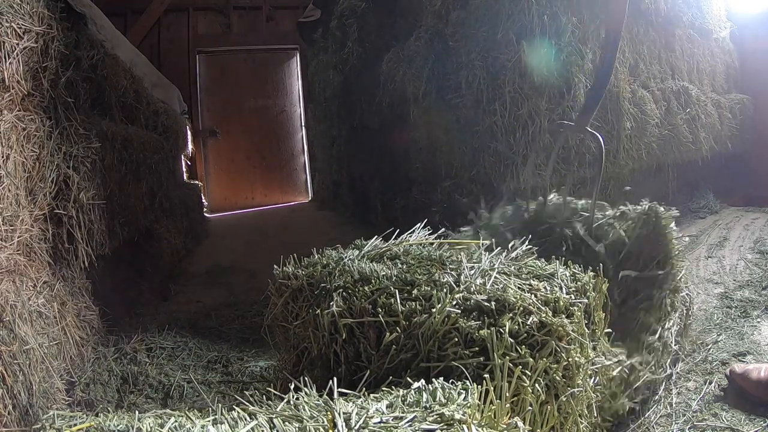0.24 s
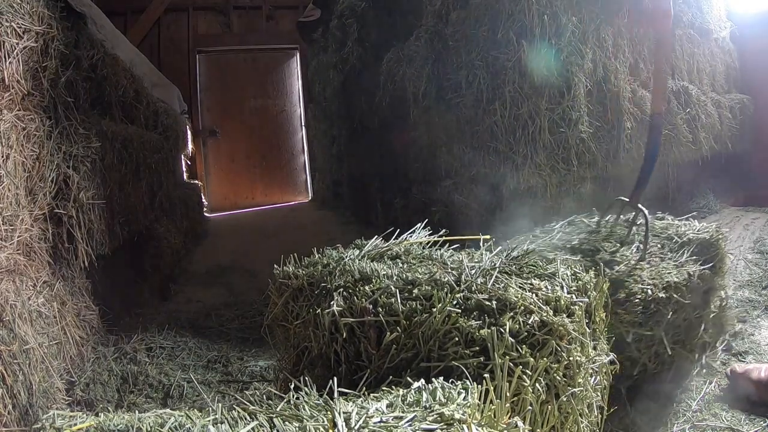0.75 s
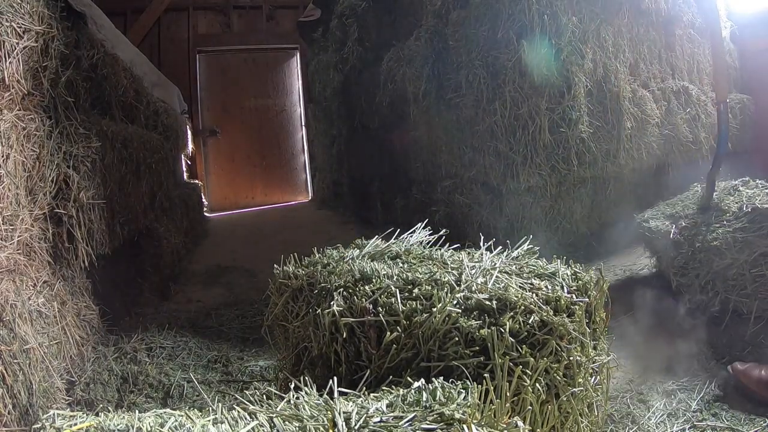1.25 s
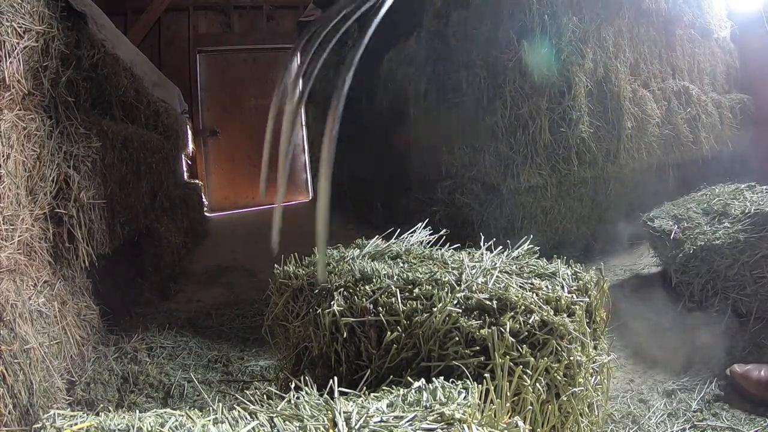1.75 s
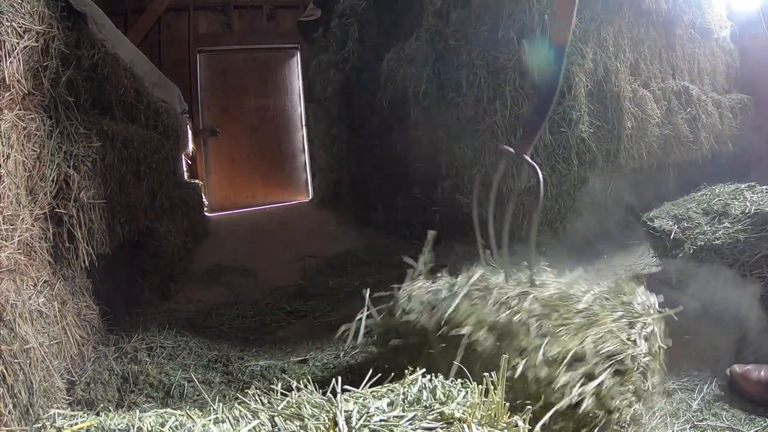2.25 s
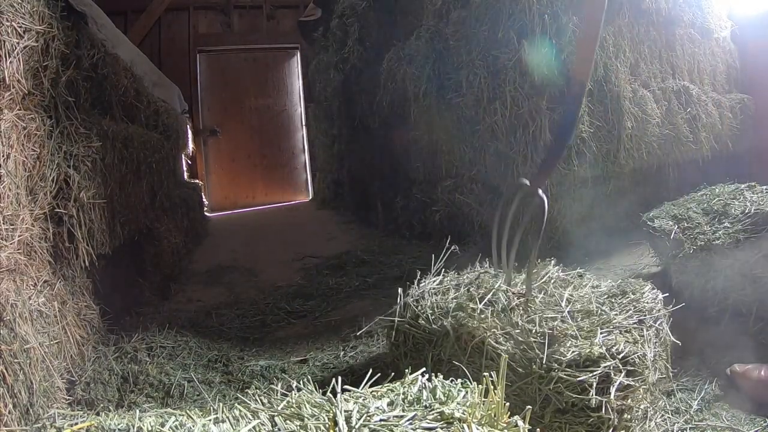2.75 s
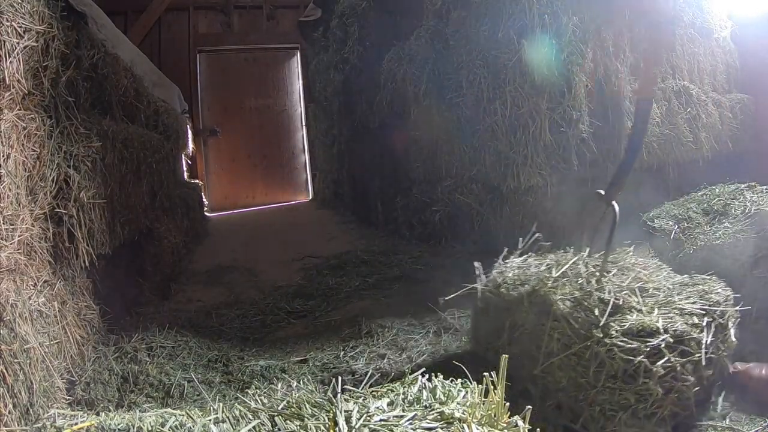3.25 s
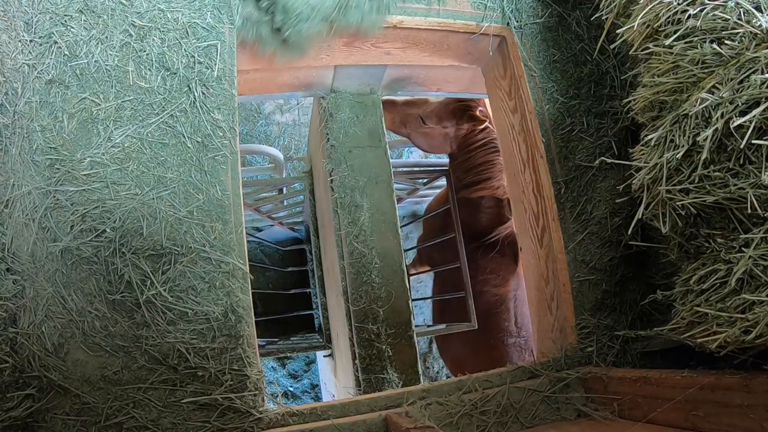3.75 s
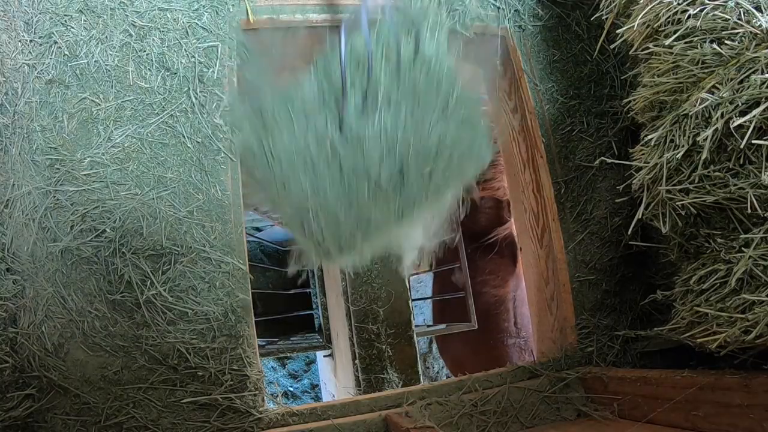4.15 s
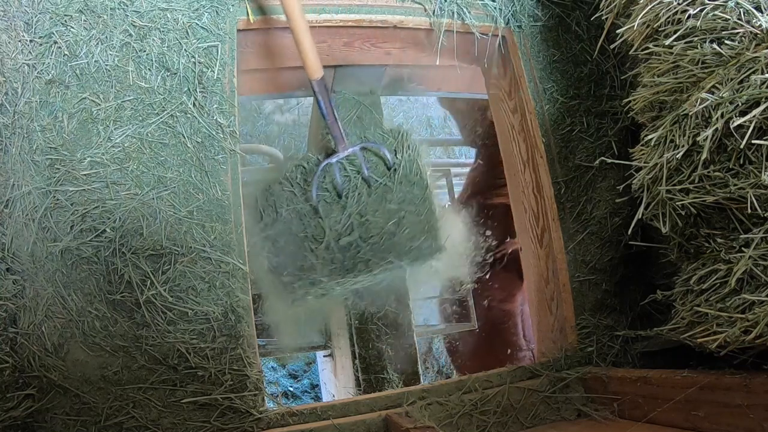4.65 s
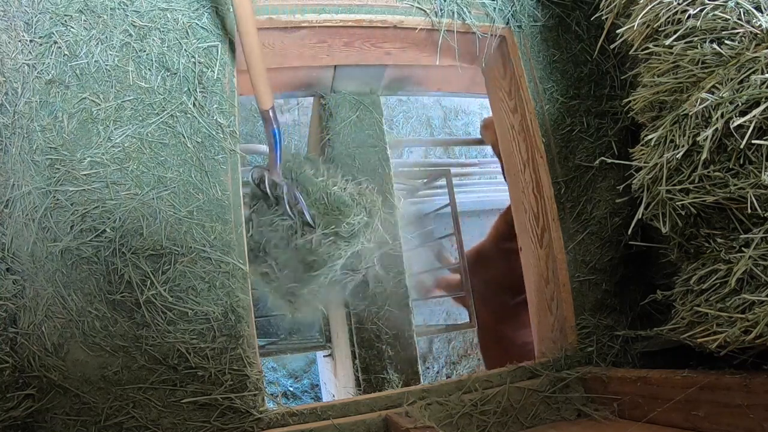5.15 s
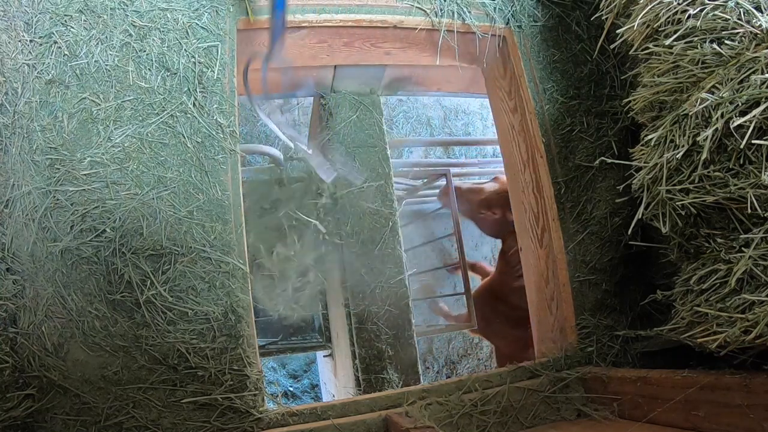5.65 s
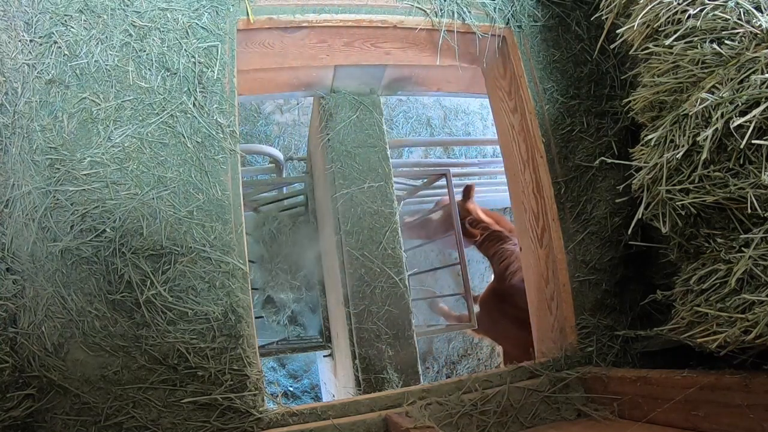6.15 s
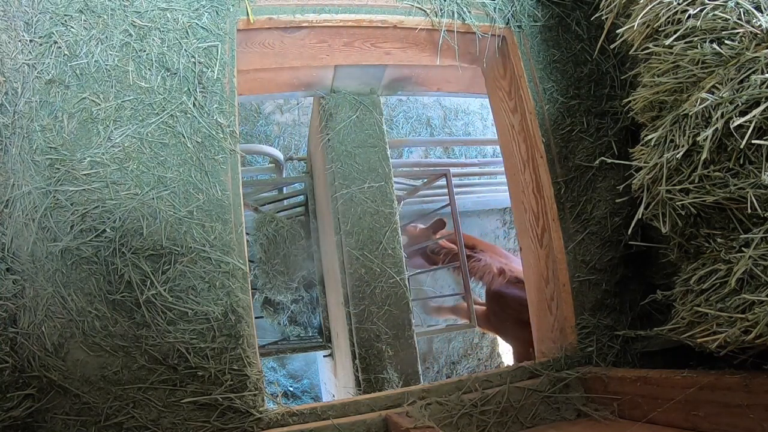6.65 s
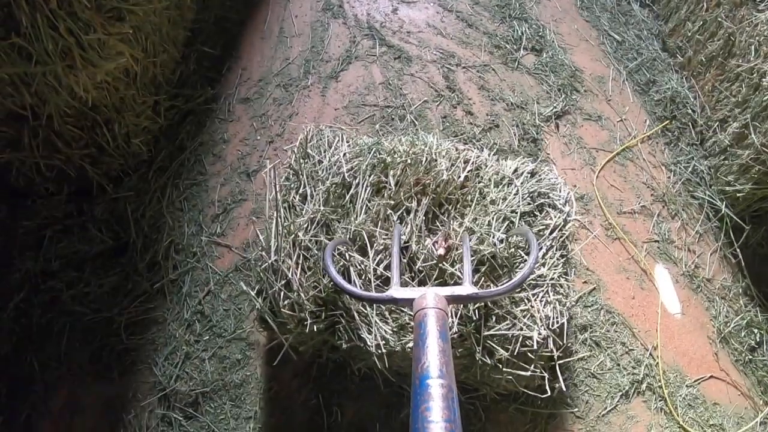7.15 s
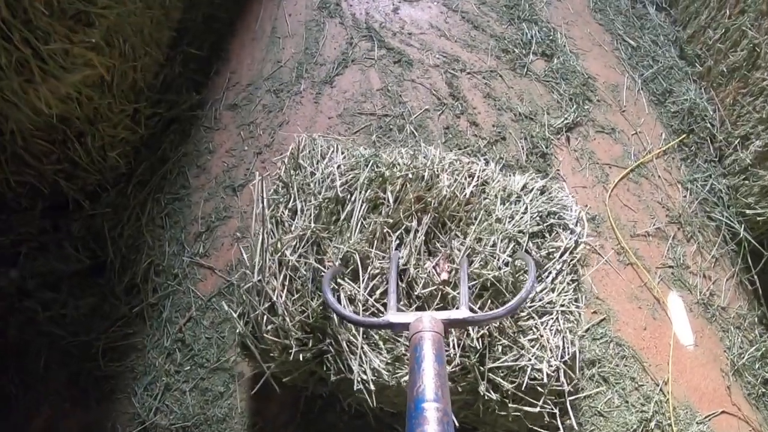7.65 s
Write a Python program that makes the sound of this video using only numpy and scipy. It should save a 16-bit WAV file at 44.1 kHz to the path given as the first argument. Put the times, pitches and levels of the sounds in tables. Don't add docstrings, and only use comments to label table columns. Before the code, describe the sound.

Pitchfork work in a hayloft: rustling stems, a soft bale thump, ringing tines, loud wooden knocks at a hatch, finally dull jolts through the handle.

```python
import sys
import numpy as np
from scipy import signal
from scipy.fft import rfft, irfft, next_fast_len
from scipy.io import wavfile
from scipy.ndimage import uniform_filter1d

SR = 44100
rng = np.random.default_rng(int(sys.argv[2]) if len(sys.argv) > 2 else 0)


def level_to_linear(level):
    exponent = np.asarray(level, float) / 20
    return 10 ** exponent


def store_wav(level_fs):
    pcm = np.round(np.clip(np.atleast_2d(level_fs), -1, 1) * 32767)
    wavfile.write(sys.argv[1], SR, pcm.T.astype(np.int16))


N = 348831

# pitch_hz, level_db, t60_s (time to fade by 60 dB)
FRAME_MODES = [(193.2, -2.5, 0.31), (244.2, 3, 0.18), (300, -9, 0.085), (373, -9.5, 0.099),
               (470, -5.5, 0.087), (524, -5.5, 0.026), (760, -8.5, 0.039), (1126, 7.5, 0.059),
               (1320, -8, .05)]
# pitch_hz, level_db, t60_s
BEAM_MODES = [(144, -15.5, .1), (249.6, -7.5, 0.12), (330, 2.5, 0.16), (453, -5.5, 0.11),
              (650, -7.5, 0.077), (739, -11.5, 0.11), (1000, -1, 0.04), (1740, -20.5, 0.036)]
# pitch_hz, level_db, t60_s
FLOOR_MODES = [(42, 11.5, 0.25), (76.6, 5.5, 0.13), (109, -23, 0.067), (146, 9, 0.058), (208.3, -9.5, 0.24),
               (330, -20.5, 0.094)]
# pitch_hz, level_db, t60_s
YOKE_MODES = [(3155, -4, 1.8), (4240, 0, 3), (4485, 1.5, 2.0)]
SCENE_CHANGES_S = [
    1.506,
    6.7,
]


def rms_one(x):
    return x / np.sqrt(np.mean(x ** 2) + 1e-20)


def mix_db(*levels):
    return 10 * np.log10(sum(level_to_linear(2 * np.asarray(db)) for db in levels))


def add(out, s, burst):
    i = round(s * SR)
    out[i:i + len(burst)] += burst[:N - i]


def in_time(tables):
    s, *columns = np.concatenate(tables).T
    return [np.interp(np.arange(N) / SR, s, c) for c in columns]


def coloured(x, spectrum):
    hz, db = np.transpose(spectrum)
    size = next_fast_len(len(x))
    grid = np.log(np.arange(size // 2 + 1) * SR / size + 1)
    gain = level_to_linear(np.interp(grid, np.log(hz), db))
    return rms_one(irfft(rfft(x, size) * gain, size)[:len(x)])


def drift(rate):
    r = np.exp(-80 * np.pi * rate / SR)
    noise = rng.standard_normal(N // 40 + 2002)
    slow = signal.lfilter([1], [1, -2 * r, r * r], noise)[2000:]
    return np.interp(np.arange(N) / 40, np.arange(len(slow)), rms_one(slow))


def grains(per_s, spread_db, clump_db, smooth):
    sizes = level_to_linear(spread_db * np.minimum(rng.exponential(1, N), 5)) * rng.choice([-1, 1], N)
    born = rng.random(N) < per_s * level_to_linear(clump_db * drift(25)) / SR
    return rms_one(rms_one(sizes * born) + smooth * rng.standard_normal(N))


def favour(hz, best_hz, slope_db):
    return -slope_db * np.log2(hz / best_hz) ** 2


def resonate(x, hz, width):
    r = np.exp(-np.pi * width / SR)
    feedback = [1, -2 * r * np.cos(2 * np.pi * hz / SR), r * r]
    return signal.lfilter([(1 - r * r) / 2, 0, (r * r - 1) / 2], feedback, x + 1e-18)


def rubbed(resonances, db, per_s, rough_db, best_hz=None, slope_db=0):
    slips = level_to_linear(db) * grains(per_s, spread_db=rough_db, clump_db=rough_db, smooth=0.65)
    out = 0
    for k, (hz, width, level) in enumerate(resonances):
        near = 1 if best_hz is None else level_to_linear(favour(hz, best_hz, slope_db))
        sharp = resonate(resonate(slips * near, hz, 2.09 * width), hz, 3 * width)
        out = out + (-1) ** k * level_to_linear(level - 3.0) * np.sqrt(SR / (3 * width)) * sharp
    return out


def struck(hits, modes, db, slope_db, rise_s):
    out, t = np.zeros(N), np.arange(SR // 2) / SR
    signs = rng.choice([-1, 1], (len(hits), len(modes)))
    for (s, peak_db, best_hz), sign in zip(hits, signs):
        body = np.zeros(len(t))
        for (hz, level, t60), g in zip(modes, sign):
            mode_db = level + favour(hz, best_hz, slope_db) - 60 * t / t60
            body += g * level_to_linear(mode_db) * np.sin(2 * np.pi * hz * t)
        body *= (1 - np.exp(-t / rise_s)) ** 2
        add(out, s, level_to_linear(peak_db + db) * body / np.abs(body).max())
    return out


def tine(taps, modes, db, cut_db, slope_db=0):
    out, t = np.zeros(N), np.arange(int(.7 * SR)) / SR
    for (s, peak_db, factor, *best_hz), luck in zip(taps, rng.standard_normal((len(taps), len(modes)))):
        next_change_s = min([c for c in SCENE_CHANGES_S if c > s])
        cut = np.where(s + t < next_change_s, 1, level_to_linear(cut_db))
        thin = np.zeros(len(t))
        for (hz, level, t60), g in zip(modes, luck):
            spot_db = favour(hz, (best_hz or [hz])[0], slope_db)
            mode_db = level + 2 * g + spot_db - 60 * t / (t60 * factor)
            thin += level_to_linear(mode_db) * np.sin(2 * np.pi * hz * t)
        add(out, s, level_to_linear(peak_db + db) * thin * cut)
    return out


def splinter(breaks):
    out, t = np.zeros(N), np.arange(SR // 6) / SR
    for (s, db, hz, decay), noise in zip(breaks, rng.standard_normal((len(breaks), len(t)))):
        edges = [0.67 * hz, min(1.48 * hz, 13000)]
        shape = level_to_linear(-60 * t / decay) * np.minimum(t / (0.029 * decay), 1)
        burst = signal.sosfilt(signal.butter(2, edges, "band", fs=SR, output="sos"), noise * shape)
        add(out, s, level_to_linear(db - 3.5) * burst / np.abs(burst).max())
    return out


def effort(moves, stops=()):
    roundness, stop_fade_s = 1.62, 0.029
    t, power = np.arange(N) / SR, np.full((2, N), 1e-12)
    for s, rise, dying, db, over_db in moves:
        stop = min([c for c in stops if c > s] + [N])
        away = np.where(t < s, (s - t) / rise, (t - s) / dying) ** roundness
        away = away + np.maximum(t - stop, 0) / stop_fade_s
        layers_db = db + np.array([[0], [over_db]])
        power += level_to_linear(2 * (layers_db - 20 * np.minimum(away, 10)))
    return 10 * np.log10(power)


def loft(x):
    t60_s = 0.42
    size = next_fast_len(N + SR)
    turn = -2j * np.pi * np.arange(size // 2 + 1) / size
    dull = 0.21 / (1 - 0.69 * np.exp(turn))
    lags = (rng.uniform(0.0098, .04, 8) * SR).astype(int)
    loops = [level_to_linear(-60 * lag / SR / t60_s) * dull * np.exp(turn * lag) for lag in lags]
    echoes = sum(g / (1 - g) * (-1) ** k for k, g in enumerate(loops))
    return irfft(rfft(x, size) * echoes, size)[:N]


def still_air():
    # pitch_hz, level_db (per Hz)
    air_colour = [(30, 0.5), (500, -6), (1000, -33), (2000, -14), (3000, -36.5), (9000, -20.5),
                  (15000, -26), (16400, -39)]
    return level_to_linear(-66.5) * coloured(rng.standard_normal(N), air_colour)


def hay_moves():
    # start_s (full effort), build_up_s, dying_s, drag_db, crackle_over_drag_db
    loft_moves = [(.23, 0.28, 0.38, -45.5, 6.5), (.72, 0.085, 0.19, -48, 3), (.97, 0.4, 0.42, -37.5, -1),
                  (1.49, 0.35, 0.27, -61.5, 14.5), (1.96, 0.043, 0.045, -42, 10.5),
                  (2.02, 0.083, 0.76, -48, 5.5), (2.285, 0.063, 0.08, -35.5, 4),
                  (2.44, 0.099, 0.16, -50.5, 1.5), (2.66, 0.064, 0.29, -58.5, 21),
                  (2.79, 0.17, 0.12, -38.5, 2), (3.25, 0.28, 0.3, -40.5, -1.5)]
    # start_s, build_up_s, dying_s, drag_db, crackle_over_drag_db
    hatch_moves = [(3.34, 0.039, 0.98, -70.5, 13.5), (3.8, 0.39, 0.22, -40, -1.5),
                   (3.975, 0.17, 0.075, -34, -24), (4.185, 0.66, 0.067, -41.5, 1),
                   (4.32, 0.071, 0.066, -32, 6), (4.42, 0.21, 0.5, -54.5, 12.5), (4.78, 0.2, 0.055, -44, 2),
                   (5.22, 1, 0.15, -42.5, 2.5), (5.54, 0.35, 0.3, -40, 3.5), (5.875, 0.33, 0.43, -46.5, 7),
                   (6.244, 0.061, 0.39, -56, 5.5), (6.42, 0.12, 0.39, -62.5, 11.5),
                   (6.629, 0.15, 0.24, -50.5, 5)]
    # start_s, build_up_s, dying_s, drag_db, crackle_over_drag_db
    push_moves = [
        (6.94, 0.04, 0.054, -34, -1),
        (6.979, .04, 0.039, -40.5, 4.5),
        (7.3, 1, 1, -62.5, -1.5),
        (7.581, 0.093, 0.35, -39, -3.5),
        (7.9, 0.16, .2, -41, -5.5),
    ]
    stops_s = [
        0.398,
        1.496,
        3.315,
        6.697,
    ]
    return effort(loft_moves + hatch_moves + push_moves, stops_s)


def hay(drag_db, crackle_db):
    # pitch_hz, level_db (per Hz)
    crackle_colour = [(880, -38), (1500, -22.5), (1610, -25.5), (1780, -26.5), (2190, -4.5), (2710, -26),
                      (4290, 1.5), (6020, -6.5), (9830, 0.5), (13500, -8), (15100, -12), (15900, -15),
                      (16400, -23)]
    # pitch_hz, level_db (per Hz)
    drag_colour = [(350, -39), (600, 1.5), (978, 1.5), (1320, 1), (1740, 1), (2320, 0.5), (4350, 1.5),
                   (5660, -5), (9940, -12), (12000, -14), (15600, -54), (22000, -120)]
    drag_db, crackle_db = mix_db(drag_db, -62.5), mix_db(crackle_db, -64)
    crackle = coloured(grains(5000, spread_db=2.0, clump_db=2.0, smooth=0.43), crackle_colour)
    drag = coloured(grains(6000, spread_db=1.0, clump_db=3.0, smooth=1.5), drag_colour)
    crackle = level_to_linear(crackle_db - 2.5 + 1.7 * drift(12.0)) * crackle
    return crackle + level_to_linear(drag_db - 1.5 + 2.0 * drift(44)) * drag


def flecks(crackle_db):
    per_s, cycles, level_db = 260, 22, -9
    clicks = grains(per_s, spread_db=3.0, clump_db=4.0, smooth=0)
    dealt = rng.integers(0, 14, N)
    rings = np.zeros(N)
    for k, hz in enumerate(np.geomspace(2200, 12500, 14)):
        rings += resonate(clicks * (dealt == k), hz, hz / cycles)
    return level_to_linear(crackle_db + level_db) * rms_one(rings)


def boards_and_joists(drag_db):
    # pitch_hz, width_hz, level_db
    board_bands = [(193.5, 42, 2.5), (263, 36, -1), (330, 56, -1.5), (479, 61, 0.5), (565, 19, -4.5),
                   (640, 130, -13), (750, 84, -10.5), (1037, 90, -8.5), (1500, 300, -17)]
    # pitch_hz, level_db (per Hz)
    joist_colour = [(12, -33.5), (20, -0.5), (27, -4.5), (59, 1), (102, -3.5), (130, -6), (200, -10.5),
                    (260, -41.5), (440, -120)]
    # start_s, scrape_over_drag_db, favoured_hz (by the spot rubbed)
    bearing = [(0, -1.5, 310), (.5, -5.5, 231), (.9, -10.5, 347), (2.25, -6.5, 318), (2.77, -1, 330),
               (3.3, -9, 332), (3.55, -4, 280), (3.85, -6.5, 400), (4.15, -1, 265), (4.45, -2, 460),
               (5.25, -2.5, 460), (5.75, -6, 300), (6.68, 1, 281)]
    # start_s, build_up_s, dying_s, scrape_db, rumble_over_scrape_db
    grinding = [
        (3.94, 0.046, 0.14, -33, -6),
    ]
    # start_s, rumble_db
    loads = [
        (.45, -35.5),
        (2.3, -59),
        (2.8, -45.5),
        (4.28, -50),
        (5.6, -46),
        (6.66, -49),
    ]
    over_db, best_hz = in_time([bearing, [(6.72, -53, 300)]])
    grind_db, shake_db = effort(grinding)
    load_db, _ = effort([(s, 0.075, 0.3, db, 0) for s, db in loads])
    scrape_db = mix_db(drag_db + over_db, grind_db)
    rumble_db = mix_db(drag_db - 11.5, shake_db, load_db, -58.5)
    joists = coloured(grains(85, spread_db=1.0, clump_db=-2.0, smooth=0.72), joist_colour)
    boards = rubbed(board_bands, scrape_db - 6.5, 500, rough_db=3.5, best_hz=best_hz, slope_db=12.0)
    return boards + level_to_linear(rumble_db - 2.5) * joists


def snaps():
    # start_s, peak_db
    thin_snaps = [(0.088, -26), (0.2713, -12.5), (0.2862, -9.5), (0.3756, -24), (1.929, -27),
                  (1.964, -10.5), (2.643, -27), (2.6898, -25), (2.709, -18), (2.7177, -17), (2.7843, -19),
                  (4.6772, -21.5), (5.467, -19), (6.2272, -32), (6.4198, -31), (6.8864, -30), (6.929, -24)]
    # start_s, peak_db
    thick_snaps = [(1.516, -42), (2.272, -16.5), (2.8248, -24), (3.019, -33.5), (3.713, -30), (4.7341, -23),
                   (4.8814, -22), (4.9756, -27), (5.0739, -21.5), (6.63, -38), (7.3856, -37),
                   (7.5615, -20.5), (7.638, -21), (7.7554, -26.5)]
    # start_s, peak_db, centre_hz, decay_s
    crunches = [
        (.394, -29, 815, 0.26),
        (1.877, -38, 7050, 0.045),
        (2.7181, -14, 3170, 0.011),
        (2.784, -21, 590, 0.025),
        (2.825, -26, 1500, 0.015),
        (3.903, -16, 760, 0.061),
        (3.992, -18, 995, 0.061),
        (4.879, -23, 4300, 0.19),
    ]
    thin_hz, thick_hz, spread, decay_s = 10500, 4150, 0.11, 0.0056
    stems = [(*snap, thin_hz) for snap in thin_snaps] + [(*snap, thick_hz) for snap in thick_snaps]
    breaks = [(s, db, hz * np.exp(spread * rng.standard_normal()), decay_s) for s, db, hz in stems]
    return splinter(breaks + crunches)


def thumps():
    # start_s, peak_db, least_favoured_hz (pitches far from it gain a little)
    landings = [
        (0.392, -18, 40.4),
        (0.414, -21, 43.1),
        (1.95, -46, 37.8),
        (2.308, -37, 55.6),
        (2.784, -29.5, 48.4),
        (4.301, -45.5, 37.7),
    ]
    return struck(landings, FLOOR_MODES, db=5.0, slope_db=-0.5, rise_s=0.0034)


def skid():
    # start_s, build_up_s, dying_s, level_db, unused_db
    skims = [
        (.97, 0.35, 0.35, -37.5, 0),
    ]
    hz, width_hz = 3000, 1870
    db, _ = effort(skims)
    hiss = resonate(resonate(rng.standard_normal(N), hz, width_hz), hz, 2 * width_hz)
    return level_to_linear(db) * rms_one(hiss)


def stem_ticks():
    # start_s, peak_db, centre_hz, decay_s
    ticks = [(1.16, -40, 4600, .005), (1.318, -30, 3600, 0.0067), (1.388, -37, 2715, 0.022),
             (1.453, -39, 1500, .008), (1.516, -39, 7200, .006), (1.557, -47, 1000, 0.007),
             (1.648, -53, 4800, .008), (1.721, -59, 8000, .005), (1.953, -24, 4600, .006),
             (1.967, -20, 9000, .012), (2.027, -33, 9500, .005), (2.078, -42, 3000, .005),
             (2.084, -14, 10500, .005), (2.176, -29, 10000, .005), (2.23, -33, 2200, .005),
             (2.281, -22, 4000, .015), (2.301, -21, 4306, .01), (3.918, -12, 1570, 0.033),
             (4.2674, -26, 4870, 0.0093), (5.572, -30, 3600, .015), (6.2877, -35, 5200, .02),
             (6.394, -38, 10500, 0.011),
             (2.704, -28, 4200, .012),
        (2.719, -25, 1100, .007),
        (2.758, -27, 4600, .025),
        (2.7845, -23, 2400, .025),
        (2.8, -26, 4400, .015),
        (2.814, -31, 900, .012),
        (2.85, -33, 4000, .01),
    ]
    return splinter(ticks)


def tine_taps():
    # start_s, peak_db, ring_time_factor, favoured_hz
    inner_taps = [
        (1.335, -42, 1.5, 8800),
        (1.3837, -26, 0.9, 9000),
        (1.441, -33, 1.5, 5600),
        (1.466, -25, 0.5, 6900),
        (1.488, -20, 0.45, 6200),
    ]
    # pitch_hz, level_db, t60_s
    inner_modes = [(5561, -3, .15), (6869, -4, .12), (8263, -1, .22), (9523, -8, .12), (9905, -3, .14),
                   (12005, -4, .16), (12900, -9, .1), (15402, -10, .1)]
    # start_s, peak_db, ring_time_factor, favoured_hz (if any)
    outer_taps = [
        (1.8894, -45, 0.5),
        (2.5294, -31, 0.97, 11500),
        (2.7182, -13, 0.74, 8600),
        (2.7836, -11, 0.34, 9600),
        (6.3939, -36, 1.2),
        (6.4198, -25, 0.97),
        (6.541, -35, 2.5),
    ]
    # pitch_hz, level_db, t60_s
    outer_modes = [(6686, -6, .22), (7905, -4, .22), (7989, -4, .15), (9065, -3, .28), (10320, -1, .22),
                   (10960, -3, .15), (12310, -8, .12), (14104, -8, .18), (14850, -10, .18)]
    # start_s, peak_db, ring_time_factor
    yoke_taps = [
        (1.35, -57, 1),
        (6.42, -52, .3),
    ]
    inner = tine(inner_taps, inner_modes, db=-19, cut_db=-33, slope_db=30.0)
    outer = tine(outer_taps, outer_modes, db=-18.5, cut_db=-30.5, slope_db=22.0)
    return inner + outer + tine(yoke_taps, YOKE_MODES, db=0, cut_db=-3)


def hatch_knocks():
    # start_s, peak_db, favoured_hz (by the spot struck)
    knocks = [(2.7195, -43, 520), (2.7835, -22.5, 408), (3.591, -33.5, 244), (3.901, -23.5, 225),
              (3.914, -40, 506), (3.99, -9.5, 414), (4.007, -19, 215), (4.273, -28.5, 507),
              (4.338, -16, 560), (5.118, -34, 490), (5.574, -13, 253)]
    return struck(knocks, FRAME_MODES, db=-1.0, slope_db=26.0, rise_s=0.0011)


def frame_contacts():
    # start_s, level_db, favoured_hz
    drags = [
        (3.53, -54, 900),
        (3.62, -44, 800),
        (3.78, -44.5, 1300),
        (3.895, -39, 1300),
        (3.921, -25, 400),
        (3.985, -26, 400),
        (4.03, -31, 258),
        (4.09, -43, 215),
        (4.14, -70, 215),
    ]
    # pitch_hz, width_hz, level_db
    frame_bands = [(215, 32, -1), (350, 40, -17.5), (479, 12, -3), (740, 54, -15.5), (1051, 88, -5),
                   (1390, 30, -11), (1640, 50, -6.5), (1850, 50, -9)]
    # start_s, peak_db, favoured_hz
    edge_knocks = [
        (3.991, -18, 1130),
        (5.124, -29, 498),
    ]
    # start_s, peak_db, favoured_hz
    chatter = [
        (3.916, -20, 480),
        (3.934, -22, 330),
        (3.952, -23, 480),
        (3.963, -21, 215),
        (3.974, -20, 480),
        (4.03, -24, 200),
        (4.068, -32, 200),
    ]
    rub_db, rub_hz = in_time([[(3.5, -95, 900)], drags, [(4.17, -94, 215)]])
    out = rubbed(frame_bands, rub_db, 1500, rough_db=0.4, best_hz=rub_hz, slope_db=5.0)
    out += struck(edge_knocks, FRAME_MODES, db=-1.0, slope_db=21.5, rise_s=.0008)
    return out + struck(chatter, FRAME_MODES, db=0.0, slope_db=16.0, rise_s=.003)


def clangs():
    # start_s, crack_db, crack_decay_s, ring_db
    strikes = [
        (3.911, -10.5, 0.048, -17),
        (3.9915, -5, 0.041, -8.5),
        (4.194, -26.5, 0.039, -29),
        (5.3385, -13.5, 0.023, -26),
    ]
    # pitch_hz, level_db, t60_s
    head_modes = [(2412, -21, 0.056), (2719, -14, 0.12), (4016, -3, 0.08), (4301, -21, 0.34),
                  (4597, 0, 0.065), (5539, -16, 0.069), (6718, -20, 0.13), (7106, -9, 0.082),
                  (8010, -9, 0.045), (8263, -7, 0.14), (9092, -8, 0.13), (11000, -21, 0.09)]
    # pitch_hz, level_db (per Hz)
    crack_colour = [(410, -30.5), (700, -11.5), (1200, -0.5), (1840, -3), (4320, 1.5), (5840, -5.5),
                    (8210, -10.5), (11500, -11), (16000, -42.5)]
    out, t = np.zeros(N), np.arange(SR // 4) / SR
    head = sum(level_to_linear(level - 60 * t / t60) * np.sin(2 * np.pi * hz * t) for hz, level, t60 in head_modes)
    for (s, db, decay, ring_db), noise in zip(strikes, rng.standard_normal((len(strikes), len(t)))):
        crack = coloured(noise, crack_colour) * level_to_linear(-60 * t / decay) * np.minimum(t / 0.0011, 1)
        add(out, s, level_to_linear(db - 1.5) * crack + level_to_linear(db + ring_db) * head)
    return out


def beam_blow():
    # start_s, peak_db, least_favoured_hz (pitches far from it gain)
    blow = [
        (5.337, 0, 450),
    ]
    ring = struck(blow, BEAM_MODES, db=6.5, slope_db=-3.0, rise_s=0.00017)
    return signal.lfilter(*signal.butter(2, 108, "high", fs=SR), ring)


def beam_slide():
    # start_s, level_db, favoured_hz
    slide = [
        (5.369, -23, 600),
        (5.47, -22, 700),
        (5.55, -25, 560),
        (5.585, -35, 300),
        (5.63, -41, 330),
        (5.68, -43, 250),
        (5.71, -64, 160),
    ]
    # pitch_hz, width_hz, level_db
    beam_bands = [(141.2, 29.5, 6.5), (255, 30, -2), (342, 10.5, 1), (470, 30, -8.5), (635, 32, -11),
                  (736, 137, -23), (1005, 22, -16), (1153, 50, -19), (1398, 49, -20), (1720, 90, -18.5)]
    # start_s, peak_db, favoured_hz
    bounces = [
        (5.346, -13, 300),
        (5.361, -13, 290),
        (5.412, -25, 620),
        (5.455, -27, 900),
        (5.478, -21, 340),
        (5.497, -23, 480),
        (5.527, -17, 330),
        (5.562, -22, 350),
    ]
    slide_db, slide_hz = in_time([[(5.34, -93, 596)], slide, [(5.8, -93, 250)]])
    rub = rubbed(beam_bands, slide_db - 0.5, 1500, rough_db=-0.64, best_hz=slide_hz, slope_db=4.5)
    return rub + struck(bounces, BEAM_MODES, db=0.0, slope_db=14.0, rise_s=.003)


def yoke_brush():
    # start_s, peak_db, ring_time_factor, favoured_hz
    brush = [
        (6.3, -58, .3, 4485),
    ]
    return tine(brush, YOKE_MODES, db=0, cut_db=-30, slope_db=300)


def tine_nick():
    # start_s, peak_db, ring_time_factor
    nick = [
        (6.63, -19, 0.78),
    ]
    # pitch_hz, level_db, t60_s
    nick_modes = [(4947, -2, .06), (6460, -15, .1), (7973, 0, .04), (9674, -8, .043), (10340, -6, .08),
                  (11450, -7, .07), (12880, -7, .05)]
    return tine(nick, nick_modes, db=-18, cut_db=-30)


def sway():
    # start_s, level_db
    tremor = [
        (6.72, -45),
        (6.986, -28),
        (7.2, -38),
        (7.526, -34),
        (7.91, -38),
    ]
    # start_s, level_db, t60_s
    pushes = [
        (6.727, -25.5, 1.2),
        (6.842, -14, .4),
        (6.932, -1.5, 0.5),
        (7.185, -23, 3.1),
        (7.373, -17, 1.1),
        (7.52, -11.5, 1.5),
        (7.862, -20, .8),
    ]
    swing_hz = 8.98
    db, = in_time([[(6.69, -93.5)], tremor])
    band = signal.butter(2, [5.5, 16], "band", fs=SR, output="sos")
    slow = signal.sosfilt(band, rng.standard_normal(N))
    out = level_to_linear(db) * slow / np.sqrt(uniform_filter1d(slow ** 2, size=SR // 6) + 1e-12)
    t = np.arange(SR) / SR
    for s, push_db, t60 in pushes:
        swing = level_to_linear(push_db - 60 * t / t60) * np.sin(2 * np.pi * swing_hz * t)
        add(out, s, swing * (1 - np.exp(-t / 0.0082)))
    return out


def hum():
    hz, width_hz = 1360, 470
    riding = np.arange(N) / SR > SCENE_CHANGES_S[-1]
    return level_to_linear(-60) * riding * rms_one(resonate(rng.standard_normal(N), hz, width_hz))


def handle_jolts():
    # start_s, peak_db, favoured_hz
    judders = [(6.759, -49, 400), (6.928, -17, 650), (6.958, -12, 270), (6.97, -11, 300), (7.28, -34, 115),
               (7.363, -42, 183), (7.599, -20, 470), (7.633, -20, 396), (7.67, -14.5, 430),
               (7.688, -13, 150), (7.712, -8, 125), (7.731, -23, 450), (7.795, -27, 115), (7.821, -21, 370),
               (7.84, -23.5, 380), (7.878, -23, 460)]
    # start_s, peak_db, favoured_hz
    jolts = [
        (6.824, -34.5, 471),
        (6.945, -9, 290),
        (7.073, -30.5, 398),
        (7.261, -35.5, 420),
        (7.325, -35, 110),
        (7.501, -23.5, 479),
        (7.565, -14.5, 410),
        (7.704, -7, 240),
        (7.756, -18.5, 440),
    ]
    # pitch_hz, level_db, t60_s
    handle_modes = [(126, 0.5, 0.12), (265, -4, 0.044), (394, -2, 0.038), (478, -2.5, 0.028),
                    (633, -10, 0.04)]
    out = struck(judders, handle_modes, db=0.5, slope_db=10.0, rise_s=0.0025)
    return out + struck(jolts, handle_modes, db=5.0, slope_db=4.0, rise_s=0.0027)


def shove():
    # start_s, build_up_s, dying_s, shaft_db, grip_over_shaft_db
    scrapes = [
        (6.78, 0.19, 0.11, -54, -2),
        (6.96, 0.034, 0.053, -19.5, 0.5),
        (7.08, 0.1, 0.19, -43, 5.5),
        (7.27, 0.02, 0.72, -46, 0.5),
        (7.51, 0.016, 0.61, -28.5, 3),
        (7.72, 0.23, 0.021, -32, 2),
        (7.89, 0.16, 0.15, -28, -1.5),
    ]
    # pitch_hz, width_hz, level_db
    shaft_bands = [(310, 130, -1.5), (397, 44, 2.5), (460, 28, -0.5), (639, 110, -7), (760, 190, -19.5)]
    # pitch_hz, width_hz, level_db
    grip_bands = [(46.6, 18, -1.5), (83, 24, -4), (118, 30, -1.5), (182, 380, -14)]
    shaft_db, grip_db = effort(scrapes)
    shaft = rubbed(shaft_bands, shaft_db - 4.0, 600, rough_db=4.5)
    return shaft + rubbed(grip_bands, grip_db + 0.5, 170, rough_db=4.5)


def footfalls():
    # start_s, peak_db, favoured_hz
    steps = [
        (6.945, -16, 75),
        (6.985, -20, 60),
        (7.265, -31, 70),
        (7.325, -28, 90),
        (7.57, -22, 60),
    ]
    return struck(steps, FLOOR_MODES, db=0.0, slope_db=6.0, rise_s=.004)


def scene():
    drag_db, crackle_db = hay_moves()
    steel = snaps() + tine_taps() + clangs()
    wood = thumps() + hatch_knocks() + beam_blow()
    room = level_to_linear(-14.5) * loft(steel) + level_to_linear(-21.5) * loft(wood)
    bed = still_air() + hay(drag_db, crackle_db) + flecks(crackle_db) + boards_and_joists(drag_db)
    near = skid() + stem_ticks() + frame_contacts() + beam_slide() + yoke_brush() + tine_nick()
    handle = sway() + hum() + handle_jolts() + shove() + footfalls()
    return (steel + wood + room + bed + near + handle)[None]


def roll_off(x):
    return signal.sosfilt(signal.butter(12, 16520, fs=SR, output="sos"), x)


def record(dry):
    low_pass = signal.ellip(10, .5, 35, 15750, fs=SR, output="sos")
    cut = signal.sosfilt(low_pass, dry)
    return roll_off(np.clip(cut, -.99, .99))


dry = scene()
out = record(dry)
store_wav(out)
```